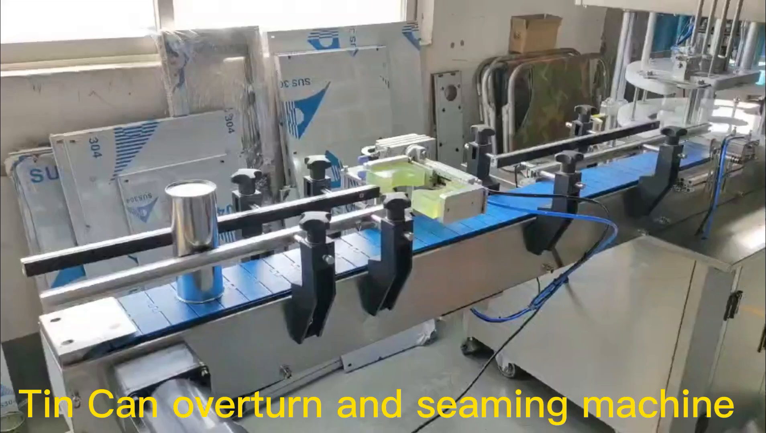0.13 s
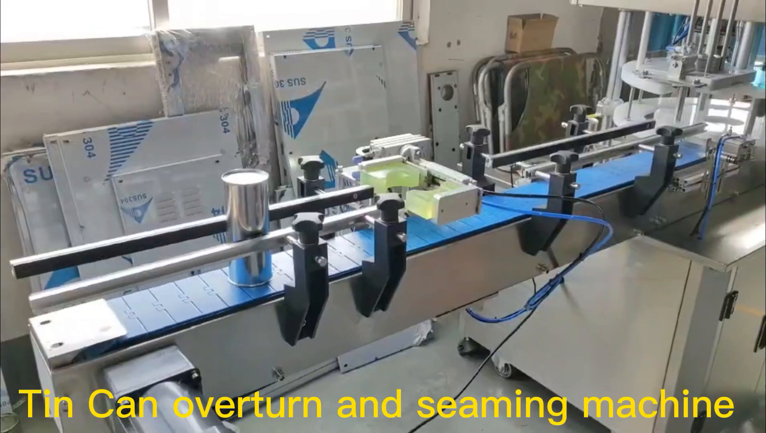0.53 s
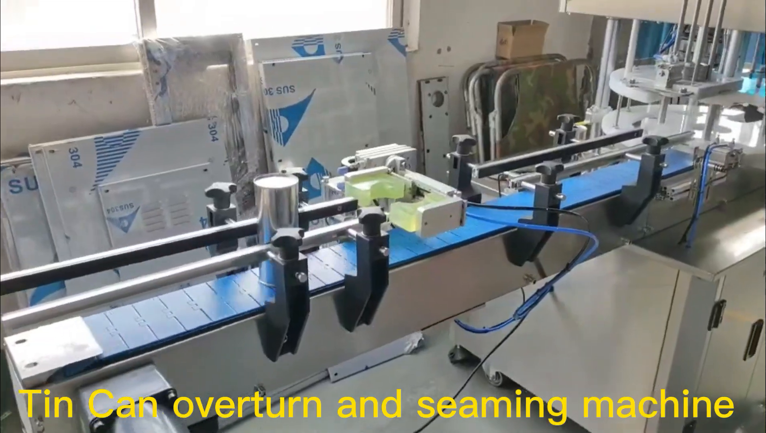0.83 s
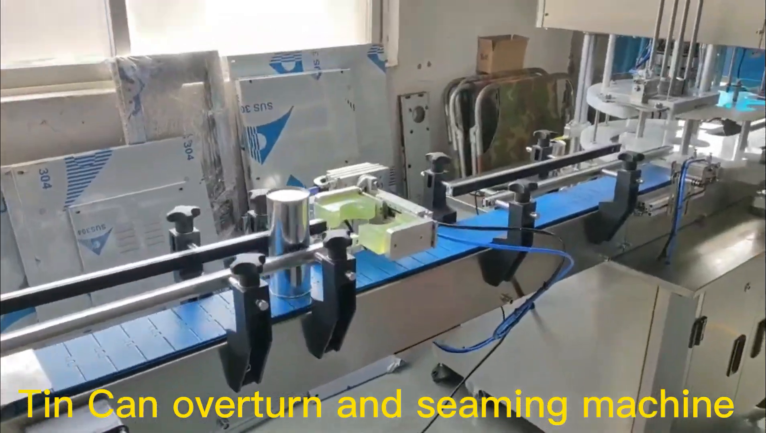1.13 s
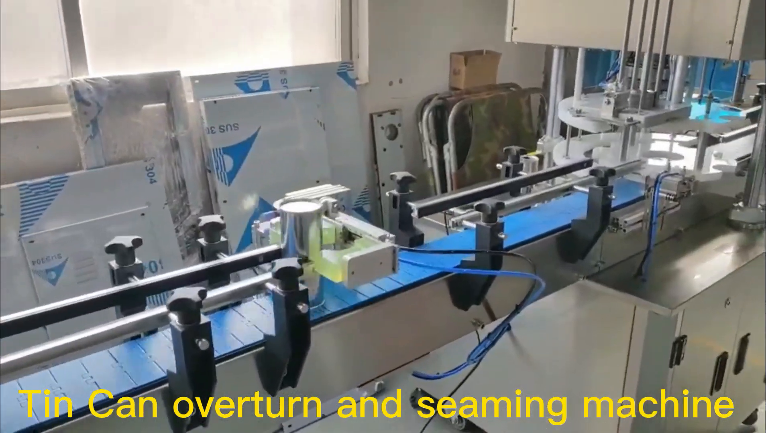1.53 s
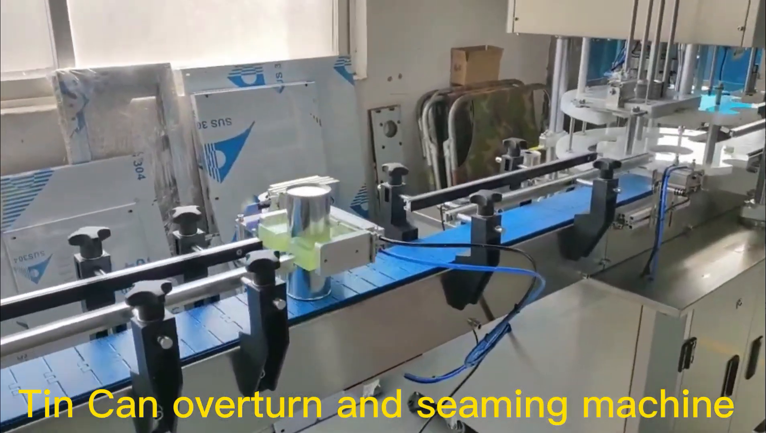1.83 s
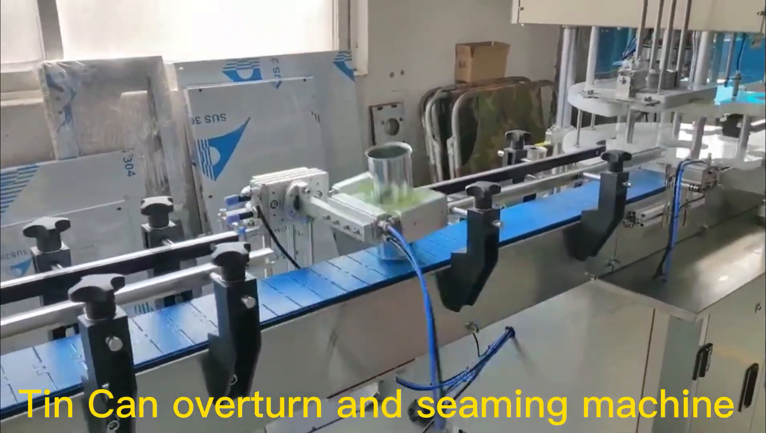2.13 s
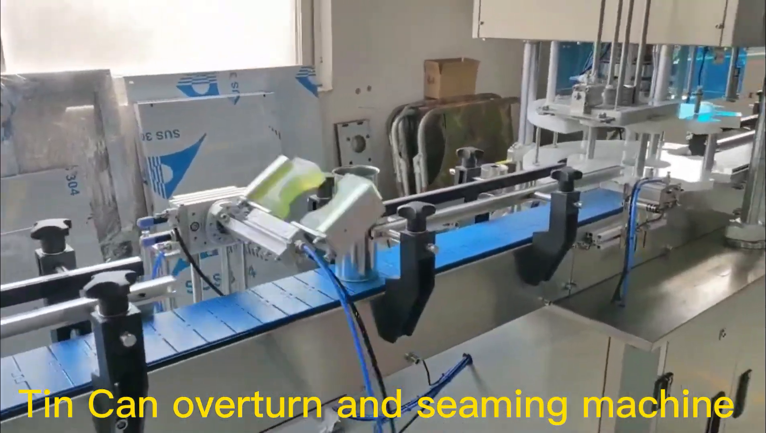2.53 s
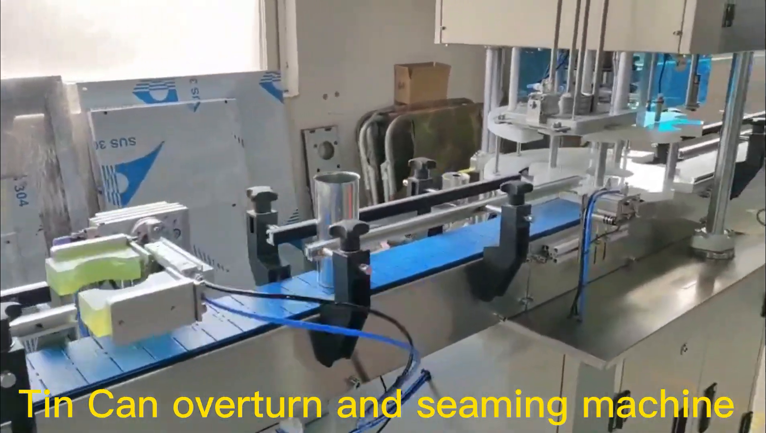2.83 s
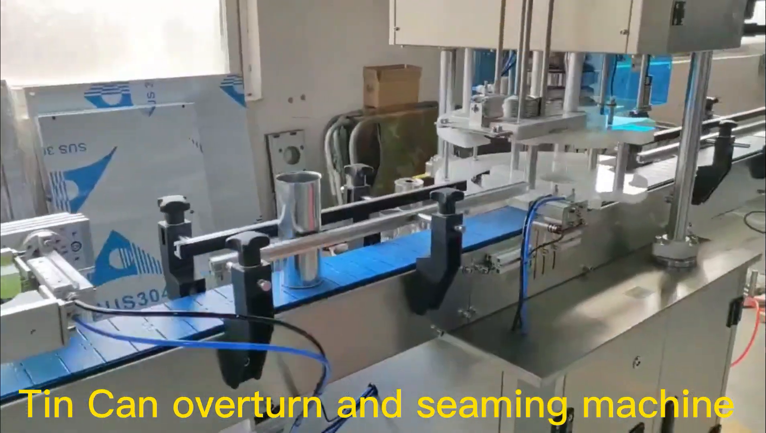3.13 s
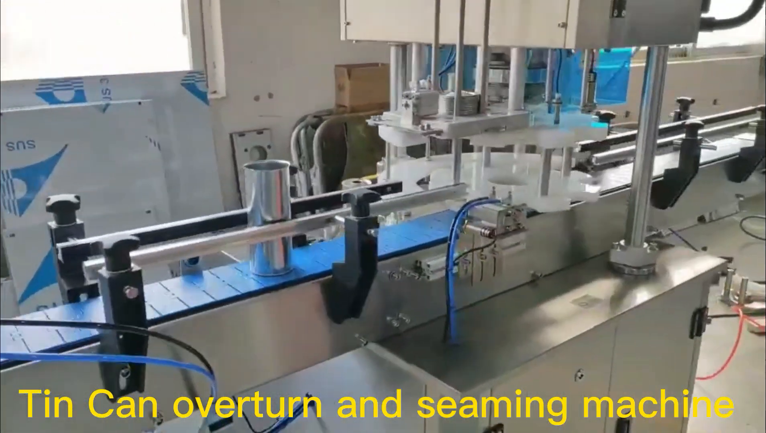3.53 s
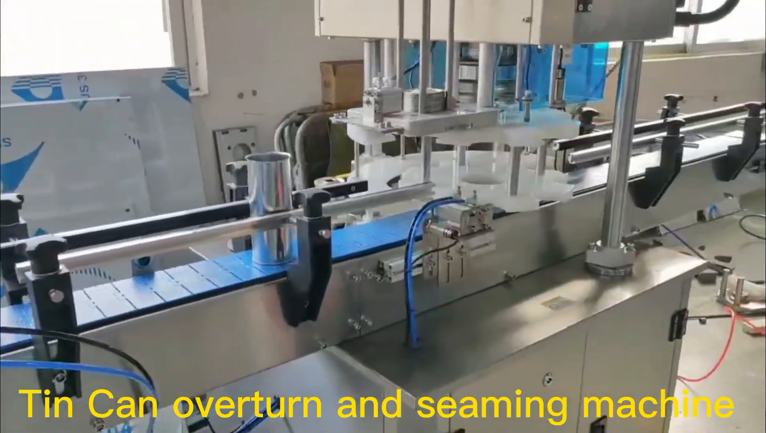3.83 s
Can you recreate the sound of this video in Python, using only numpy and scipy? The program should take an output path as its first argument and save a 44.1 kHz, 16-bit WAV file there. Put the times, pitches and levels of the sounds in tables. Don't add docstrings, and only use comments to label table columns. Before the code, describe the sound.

After a brief silence, a soft belt rattle grows into a steady whir with a rising gear tone, then two clusters of valve ticks, air puffs and metallic knocks; close single microphone, short room echo.

```python
import sys
import numpy as np
from scipy import signal
from scipy.fft import rfft, irfft
from scipy.io import wavfile
from scipy.ndimage import uniform_filter1d

SR = 44100
rng = np.random.default_rng(int(sys.argv[2]) if len(sys.argv) > 2 else 0)


def master_out(mix):
    frames = np.transpose(np.atleast_2d(mix))
    ceiling = np.clip(frames, -1, 1)
    pcm = np.round(ceiling * 32767).astype(np.int16)
    wavfile.write(sys.argv[1], SR, pcm)


def invert_db(x):
    u = np.asarray(x, float) / 20
    return 10 ** u


N = 176400


def evened(x):
    return x / np.sqrt(np.mean(x ** 2) + 1e-20)


def read(points, hz):
    f, value = np.transpose(points)
    return np.interp(np.log(hz + 1), np.log(f + 1), value)


def curve(table, col):
    rows = np.array(table)
    return np.interp(np.arange(N) / SR, rows[:, 0], rows[:, col])


def add(mix, s, sound):
    part = mix[round(s * SR):][:len(sound)]
    part += sound[:len(part)]


def resonate(x, hz, width):
    turn = np.exp(2j * np.pi * hz * np.arange(len(x)) / SR)
    r = np.exp(-np.pi * width / SR)
    return 2 * (turn * signal.lfilter([1 - r], [1, -r], x / turn)).real


def coloured(x, points):
    hz = np.fft.rfftfreq(len(x), 1 / SR)
    inside = (hz >= points[0][0]) & (hz <= points[-1][0])
    return irfft(rfft(x) * invert_db(read(points, hz)) * inside, len(x))


def drift(size):
    return evened(uniform_filter1d(uniform_filter1d(rng.standard_normal(N), size), size))


# pitch_hz, level_db (per Hz)
IDLE_SPECTRUM = [(18, -64), (30, -60), (132, -17), (213, -3), (389, -11.5), (693, -15), (785, -12.5),
                 (4020, -41.5), (12100, -50.5), (15800, -77), (22000, -120)]


def idle_machines():
    return invert_db(-46.5) * evened(coloured(rng.standard_normal(N), IDLE_SPECTRUM))


# time_s, belt_rattle_db, frame_hum_db
RUN = [(.14, -59.5, -61), (.25, -59.5, -54), (.36, -51, -47), (.5, -43, -56.5), (.64, -42.5, -50.5),
       (1.1, -42, -46), (1.36, -39, -47), (1.59, -40, -47.5), (1.86, -40, -32.5), (2.05, -41, -33.5),
       (2.33, -39, -35), (2.52, -37, -31), (2.6, -33, -52), (2.68, -39.5, -29.5), (3.04, -41, -36),
       (3.45, -40, -31.5), (4, -39, -32)]
# pitch_hz, level_db (per Hz)
BELT_LOW = [(12, -77), (20, -39), (107, -24), (185, -5.5), (242, -5), (347, -11), (394, -10), (507, -8.5),
            (1500, -19), (1950, -32), (3300, -120)]
# pitch_hz, level_db (per Hz)
BELT_HIGH = [(880, -23), (1500, -6.5), (2410, 1.5), (4440, -10.5), (6520, -8.5), (7050, -15), (9010, -19),
             (11600, -22), (12100, -28.5), (15800, -50), (22000, -120)]
LOW_DB, HIGH_DB, LOW_FOLLOWS_HUM = 3.5, 0, 0.16
PATCH_DB, FLICKER_DB, RATTLE_DB, RATTLES_PER_S = 1.5, .7, -13, 400


def belt():
    frames = N // 128 + 5
    a, b, patches = rng.standard_normal((frames, 257, 3)).T
    patches = uniform_filter1d(uniform_filter1d(patches, size=8, axis=0), size=20, axis=1)
    grains = (a + 1j * b) * invert_db(PATCH_DB * evened(patches))
    wash = evened(signal.istft(grains, nperseg=512, noverlap=384)[1][:N])
    chance, sizes = rng.random(N), rng.exponential(1, N)
    ticks = (chance < RATTLES_PER_S / SR) * invert_db(2.4 * np.minimum(sizes, 5))
    fade = np.exp(-np.arange(130) / 68.0)
    ticks = np.convolve(ticks, fade)[:N] * rng.standard_normal(N)
    drive = (wash + invert_db(RATTLE_DB) * evened(ticks)) * invert_db(FLICKER_DB * drift(size=900))
    belt_db, hum_db = curve(RUN, col=1), curve(RUN, col=2)
    low_db = belt_db + LOW_FOLLOWS_HUM * (hum_db - belt_db)
    low = invert_db(low_db + LOW_DB) * evened(coloured(drive, BELT_LOW))
    high = invert_db(belt_db + HIGH_DB) * evened(coloured(drive, BELT_HIGH))
    return low + high


# pitch_hz, width_hz, level_db
FRAME = [(184.2, 7, 3.5), (211.2, 13.3, -2.5), (235.6, 6.8, 1.5), (256.7, 6.8, -9.5), (303, 33, -5.5),
         (470.2, 19, -9)]
FRAME_DB, FRAME_SWELL_DB, FRAME_STEADY = -1, 1, .5


def frame():
    hum = np.zeros(N)
    for hz, width, db in FRAME:
        shaking = rng.standard_normal(N)
        tone = evened(resonate(resonate(shaking, hz, width), hz, 2 * width))
        power = uniform_filter1d(tone ** 2, size=1500)
        steadied = tone / (power + 0.058) ** (FRAME_STEADY / 2)
        hum += invert_db(db + FRAME_SWELL_DB * drift(size=2500)) * steadied
    return invert_db(curve(RUN, col=2) + FRAME_DB) * evened(hum)


# start_s, level_db, brightness_db (per octave), thud_db
KNOCKS = [(.215, -72, -14, -52), (.5205, -42, -4, -73), (1.405, -67, -21, -47), (1.661, -50, -19, -46),
          (1.811, -43, 3, -37.5), (1.932, -39.5, 7, -41), (2.346, -36.5, -7, -54), (2.404, -36, -2.5, -40),
          (2.439, -27.5, -4, -57), (2.4456, -42.5, 8.5, -55), (2.4522, -46, 10, -57),
          (2.502, -36, 3.5, -42), (2.562, -37.5, -1, -40), (3.201, -36, -7.5, -53)]
# pitch_hz, level_db, fade_s (time to fall 60 dB)
CAN = [(478, 3, .3), (505, 1, .12), (720, -2, .12), (754, 6, .18), (1771, -6, .06), (2024, -4, .06),
       (2300, -7, .05), (2611, -5, .04), (2950, -4, .04), (3012, -13, .2), (3747, -12, .03),
       (4258, -13, .03), (5733, -16, .05)]
# pitch_hz, level_db
CLATTER = [(250, -19), (500, 13), (1200, -13.5), (2500, 0.5), (4500, -5), (8000, -37)]
CLATTER_DB, CLATTER_FADE_S = 5.5, 0.15
THUD_HZ, THUD_FADE_S = 82, .1


def knocks():
    out, t = np.zeros(N), np.arange(SR // 2) / SR
    chance = rng.standard_normal((len(KNOCKS), len(CAN)))
    rattle = rng.standard_normal((len(KNOCKS), len(t)))
    for (s, db, bright_db, thud_db), row, noise in zip(KNOCKS, chance, rattle):
        ring = np.zeros(len(t))
        for (hz, tone_db, fade_s), luck_db in zip(CAN, row):
            start_db = tone_db + luck_db + bright_db * np.log2(hz / 500)
            ring += invert_db(start_db - 60 * t / fade_s) * np.sin(2 * np.pi * hz * t)
        clatter_db = CLATTER_DB + bright_db - 60 * t / CLATTER_FADE_S
        ring += invert_db(clatter_db) * evened(coloured(noise, CLATTER))
        thud = invert_db(thud_db - 60 * t / THUD_FADE_S) * np.sin(2 * np.pi * THUD_HZ * t)
        thud *= np.minimum(t / 0.01, 1)
        add(out, s, invert_db(db) * ring * np.minimum(t / 0.0028, 1) + thud)
    return out


# start_s, peak_db
CLICKS = [(.2445, -33), (.797, -38), (1.6562, -16), (1.7888, -19), (2.1428, -21), (2.3442, -16),
          (2.4175, -22), (2.4525, -23), (2.5018, -16), (2.5036, -17), (2.5052, -17), (2.5075, -20),
          (2.5612, -20), (3.8262, -25)]
# pitch_hz, level_db, fade_s (time to fall 60 dB)
PLUNGER = [(2600, -1, .004), (3300, 0, .0035), (4100, 0, .003), (5000, -2, .003), (6300, -5, .0025)]


def valves():
    out, t = np.zeros(N), np.arange(400) / SR
    chance = rng.standard_normal((len(CLICKS), len(PLUNGER)))
    for (s, db), row in zip(CLICKS, chance):
        tick = np.zeros(len(t))
        for (hz, tone_db, fade_s), luck in zip(PLUNGER, row):
            tone = np.sin(2 * np.pi * hz * (1 + .05 * luck) * t)
            tick += invert_db(tone_db + luck - 60 * t / fade_s) * tone
        tick *= np.minimum(t / .0004, 1) ** 2
        add(out, s, invert_db(db) * tick / abs(tick).max())
    return out


# pitch_hz, level_db
WHINE = [(5517, -67), (5658, -62), (5729, -63), (5970, -67), (6277, -64), (6347, -69), (6490, -57.5),
         (6561, -59.5), (6665, -67), (7620, -72), (8092, -75), (11243, -72), (11600, -70), (12010, -80)]
# start_s, top_s, from_hz, to_hz, level_db, gone_s
CHIRP = (.245, .33, 9800, 12010, -74, .95)
# time_s, level_db
WHINE_NEAR = [(.3, -6.5), (1.7, 6.5), (2.5, 5), (3.9, 0.5)]
WHINE_WIDTH_HZ, WHINE_RISE_S = 3, 0.25


def whine():
    t = np.arange(N) / SR
    lines = np.zeros(N)
    for hz, db in WHINE:
        level = invert_db(db + 2 * drift(size=1200))
        cycles = hz * t + np.cumsum(WHINE_WIDTH_HZ * drift(size=1500)) / SR
        lines += level * np.sin(2 * np.pi * cycles)
    start_s, top_s, from_hz, to_hz, chirp_db, gone_s = CHIRP
    climb = np.clip((t - start_s) / (top_s - start_s), 0, 1)
    chirp_hz = from_hz + (to_hz - from_hz) * climb ** 0.51
    chirp_gate = (climb > 0) * np.clip(3 * (gone_s - t), 0, 1)
    chirp = invert_db(chirp_db) * chirp_gate * np.sin(2 * np.pi * np.cumsum(chirp_hz) / SR)
    rise = np.clip((t - start_s) / WHINE_RISE_S, 0, 1)
    return np.sqrt(2) * (lines * invert_db(curve(WHINE_NEAR, col=1)) * rise + chirp)


# time_s, pitch_hz, level_db
GEAR = [(1.15, 170.7, -65), (1.3, 182, -48), (1.42, 191.8, -36.5), (1.49, 201, -40), (1.545, 213.6, -37),
        (1.61, 233.4, -38), (1.66, 241.8, -40), (1.715, 239.3, -26.5), (1.76, 255.8, -33.5),
        (1.82, 265, -37), (1.87, 268.4, -40.5), (2.0, 289.4, -53), (2.15, 323, -44), (2.25, 336.7, -49),
        (2.4, 352, -51), (2.75, 386, -55.5), (2.92, 394, -37), (3.1, 394, -52.5), (4, 390, -45)]
GEAR_WANDER, GEAR_ROUGH_DB, GEAR_RING_DB = .02, 2.5, 6


def gear():
    hz = curve(GEAR, col=1) * (1 + GEAR_WANDER * drift(size=500))
    fade = np.clip((np.arange(N) / SR - GEAR[0][0]) / 0.32, 0, 1)
    level = invert_db(curve(GEAR, col=2) + GEAR_ROUGH_DB * drift(size=500))
    tone = np.sqrt(2) * fade * level * np.sin(2 * np.pi * np.cumsum(hz) / SR)
    ring = sum(invert_db(db) * resonate(tone, f, width) for f, width, db in FRAME)
    return tone + invert_db(GEAR_RING_DB) * ring


# start_s, attack_s, level_db, fade_s (time to fall 60 dB)
PUFFS = [
    (1.798, 0.015, -24.5, 0.21),
    (1.9, 0.011, -27.5, 0.41),
    (1.93, .005, -52, 0.15),
    (2.4, 0.026, -27, .2),
    (2.501, 0.004, -27.5, 0.11),
    (2.554, 0.012, -27, 0.25),
]
# pitch_hz, level_db (per Hz)
AIR = [(710, -30), (1200, -4.5), (1500, -12), (3620, -3.5), (4650, -7.5), (6160, 2.5), (7050, -9.5),
       (7920, -14.5), (12100, -16.5), (15800, -56), (22000, -120)]
# pitch_hz, width_hz, level_db
NOZZLE = [(6300, 600, -4), (6580, 300, 11)]
NOZZLE_DB, SPUTTER_DB = -9.5, 1.5


def puffs():
    jet = evened(coloured(rng.standard_normal(N), AIR))
    whistle = sum(invert_db(db) * resonate(jet, hz, width) for hz, width, db in NOZZLE)
    jet = jet + invert_db(NOZZLE_DB) * evened(whistle)
    power = np.zeros(N)
    t = np.arange(SR // 2) / SR
    for s, attack, db, fade_s in PUFFS:
        fall_db = 120 * np.maximum(t - attack, 0) / fade_s
        add(power, s, invert_db(2 * db - fall_db) * np.minimum(t / attack, 1) ** 2)
    return evened(jet) * np.sqrt(power) * invert_db(SPUTTER_DB * drift(size=90))


def workshop(x):
    t = np.arange(SR // 2) / SR
    fade_s = 0.16
    tail = rng.standard_normal(len(t)) * invert_db(-60 * t / fade_s) * (t > .006)
    return signal.fftconvolve(x, tail / np.linalg.norm(tail))[:N]


def scene():
    steady = idle_machines() + belt() + frame() + whine() + gear()
    clamp = knocks() + valves() + puffs()
    return (steady + clamp + invert_db(-9) * workshop(clamp))[None]


# pitch_hz, score_needed (no unit)
DROPPED = [(3300, -1.9), (4500, -.6), (5600, -1.2), (6650, -1.3), (7000, .5), (7900, .9), (8800, 2.2),
           (9400, 1.2), (10300, 1.1), (10900, 2.2), (11500, 1.5), (12000, 1.7)]
# pitch_hz, level_db
MAKE_UP = [(6800, 0), (7300, 3), (8800, 3), (11000, 3), (11500, 2), (12000, 7)]
BAND_BINS, GRID, TOP_BIN = 4, 576, 564


def patchy_treble(x):
    n, k = np.arange(2048)[:, None], np.arange(TOP_BIN)
    window = signal.windows.kaiser_bessel_derived(2048, 4 * np.pi)[:, None]
    basis = window * np.cos(np.pi / 1024 * (n + 512.5) * (k + .5)) / np.sqrt(512)
    halves = np.pad(x, (2048 - GRID, 4096))[:(N // 1024 + 4) * 1024].reshape(-1, 1024)
    z = np.hstack([halves[:-1], halves[1:]]) @ basis
    hz, band = (k + .5) * SR / 2048, k // BAND_BINS
    power = uniform_filter1d(np.add.reduceat(z ** 2, k[::BAND_BINS], axis=1), size=3, axis=0)
    level_db = 10 * np.log10(abs(power) + 1e-20)
    mid_db = level_db[:, 6:40].mean(1, keepdims=True)
    usual_mid_db = np.median(mid_db)
    excess_db = level_db - np.median(level_db, axis=0) - .9 * (mid_db - usual_mid_db)
    tonal_db = level_db - uniform_filter1d(level_db, size=7, axis=1)
    luck = uniform_filter1d(rng.standard_normal(level_db.shape), size=2, axis=0)
    luck = evened(uniform_filter1d(luck, size=2, axis=1))
    quiet_bonus = np.clip((usual_mid_db - mid_db - 8) / 2, 0, 3)
    score = .8 * luck + np.clip(excess_db / 8, -.5, 1.2) + tonal_db / 5 + quiet_bonus
    keep = score[:, band] > read(DROPPED, (band + .5) * BAND_BINS * SR / 2048)
    keep = keep | (hz < DROPPED[0][0])
    blocks = (z * keep * invert_db(read(MAKE_UP, hz))) @ basis.T
    return (blocks[1:, :1024] + blocks[:-1, 1024:]).ravel()[1024 - GRID:][:N]


def low_pass(x):
    return signal.sosfilt(signal.butter(12, 12130, fs=SR, output="sos"), x)


def record(dry):
    t, start_s = np.arange(N) / SR, .1365
    gate = np.clip((t - start_s) / 0.0064 + 1, 0, 1) * np.clip((t[-1] - t) / 0.0073, 0, 1)
    mix = gate * patchy_treble(gate * dry[0])
    return low_pass(mix[None])


dry = scene()
out = record(dry)
master_out(out)
```